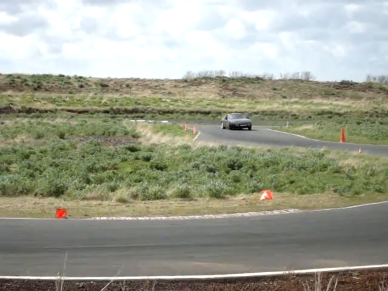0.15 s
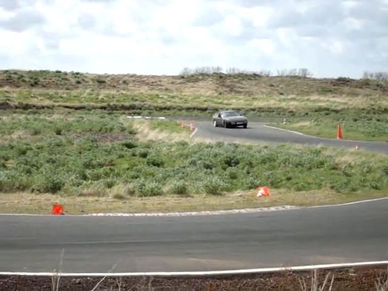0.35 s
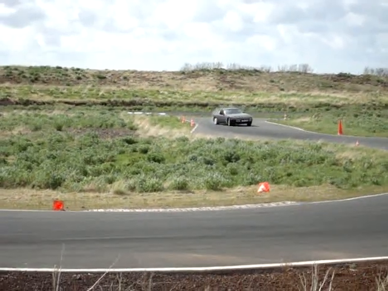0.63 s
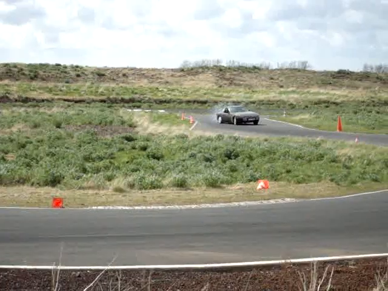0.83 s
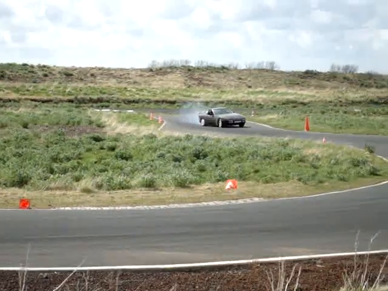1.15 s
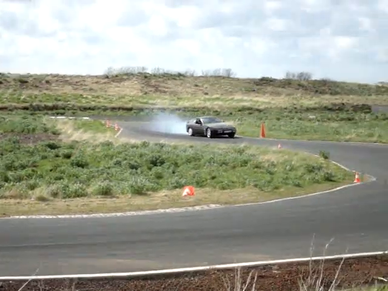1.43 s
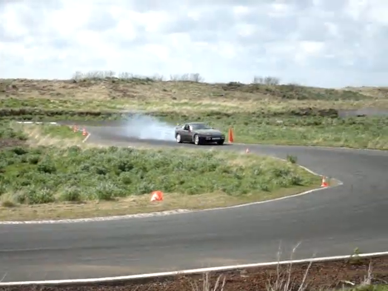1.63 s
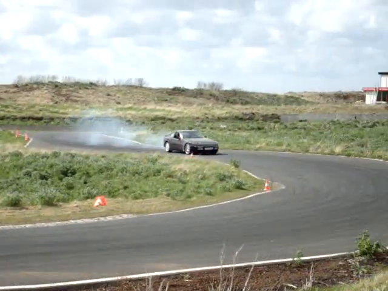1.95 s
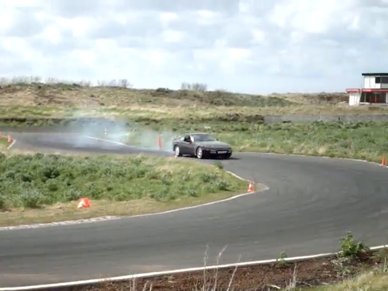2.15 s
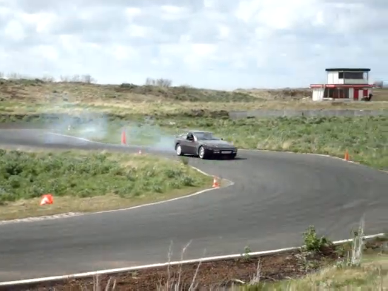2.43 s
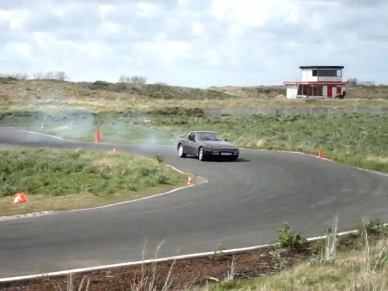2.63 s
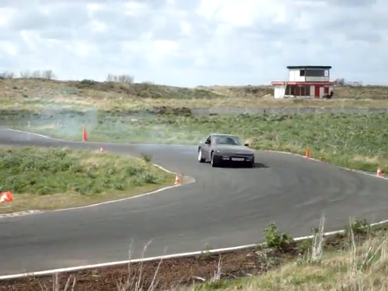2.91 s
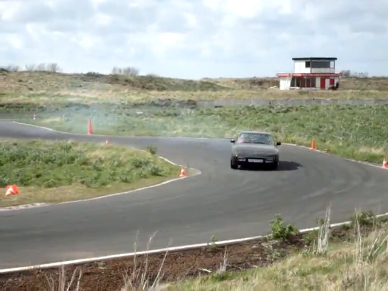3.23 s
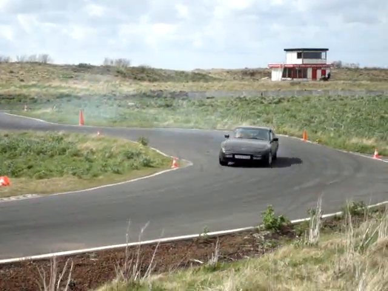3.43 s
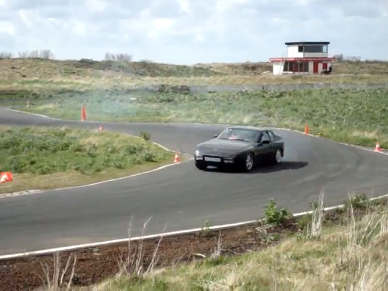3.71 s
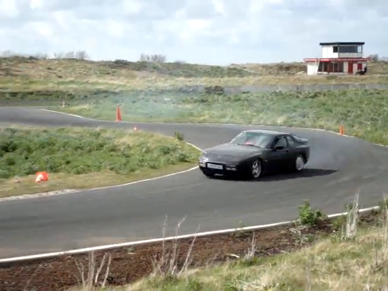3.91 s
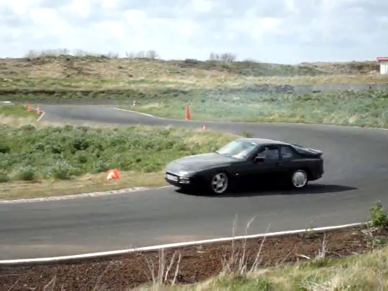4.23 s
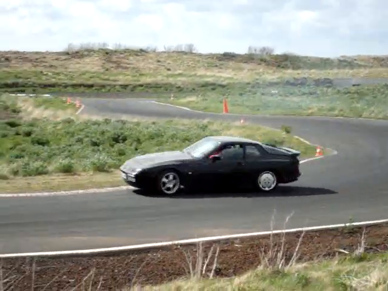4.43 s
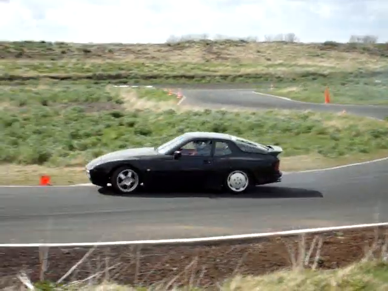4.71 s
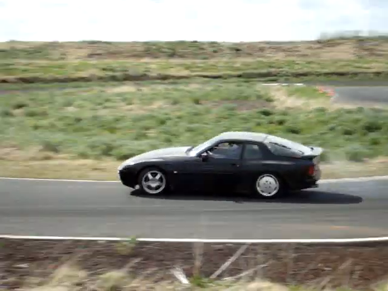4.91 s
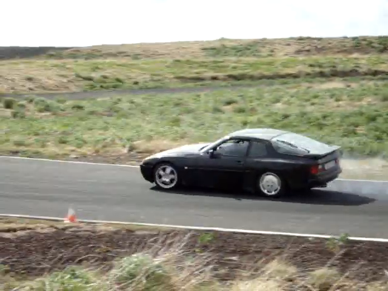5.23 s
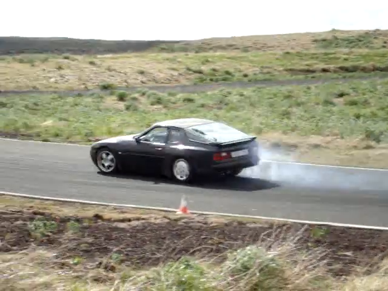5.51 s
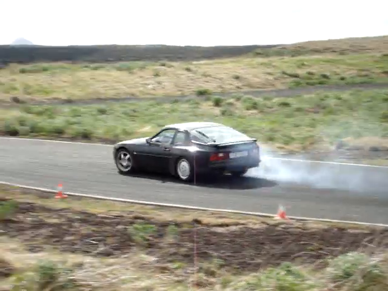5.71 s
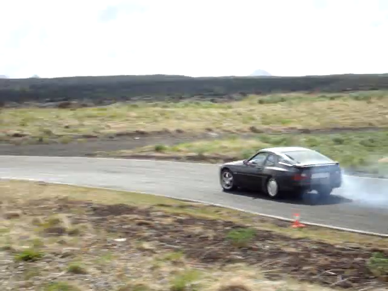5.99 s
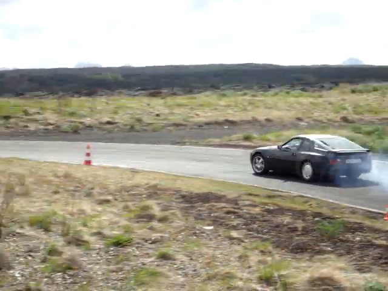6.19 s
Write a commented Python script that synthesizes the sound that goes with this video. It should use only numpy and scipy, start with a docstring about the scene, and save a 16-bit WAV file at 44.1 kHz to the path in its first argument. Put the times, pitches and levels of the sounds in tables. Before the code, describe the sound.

An open-air track heard through one unprotected microphone, with faint steady hiss. From 0 s, wind gusts strike in quick lumpy bursts, with low thuds and sharp cracks, hardest around 2 to 2.7 s. Beneath them a distant car engine rises from 0 to about 1.4 s, with tyre scrub and hiss and a thin, restless high whine from about 0.6 to 1.7 s. The throttle lifts; engine pitch and level sink, leaving mostly wind until about 3 s, when slight scrubbing and a small rev return. Gusts ease after 3.6 s. Around 3.8 s tyres catch with a rough chirp, then a loud mid-pitched squeal holds from 4 to 5.9 s, wavering rapidly about eight times a second, with brief harsher screeches, roaring rubber and gritty hiss. The engine grows lower-toned and stronger near 5.6 s. The squeal climbs slightly, blurs and fades by 6.3 s.

```python
"""A sports car drifts round a kart track. Far off, spinning tyres hiss and whine as the engine rises;
off the throttle comes a lull, then a long squealing slide close by, which fades at the end.
Gusts buffet the microphone throughout, hardest before the slide. Wind and rubber are filtered noise,
the engine a sum of harmonics, the squeal a phase-modulated tone; a fast limiter holds the peaks down."""
import sys
import numpy as np
from scipy import signal
from scipy.fft import rfft, irfft, next_fast_len
from scipy.io import wavfile
from scipy.ndimage import uniform_filter1d, minimum_filter1d

SR = 44100
rng = np.random.default_rng(int(sys.argv[2]) if len(sys.argv) > 2 else 0)


def transcribe(u):
    """Save the signal u as a 16-bit wav file named by the first command-line argument.

    u: samples, shape (n,) or (channels, n), limited to [-1, 1]; the rate is SR.
    q: integer samples, one column per channel.
    """
    v = np.clip(np.atleast_2d(u).T, -1, 1)
    q = np.round(v * 32767).astype(np.int16)
    wavfile.write(sys.argv[1], SR, q)


N = 280476
TIME = np.arange(N) / SR


def amp(db):
    """Level law: decibels to amplitude gain."""
    return 10 ** (np.asarray(db) / 20)


def unit(x):
    """Normalisation to unit rms."""
    return x / np.sqrt(np.mean(x ** 2) + 1e-20)


def curves(rows):
    """Linear interpolation in time of each column of a table."""
    s, *columns = np.transpose(rows)
    return [np.interp(TIME, s, column) for column in columns]


def colour(points, hz):
    """Spectral envelope: gain at the given frequencies, in dB straight against log frequency."""
    f, db = np.transpose(points)
    return amp(np.interp(np.log(hz + 1), np.log(f + 1), db))


def shaped(x, points):
    """Linear filtering: multiplies the spectrum of a sound by an envelope."""
    return irfft(rfft(x) * colour(points, np.fft.rfftfreq(N, 1 / SR)), N)


def wander(hz):
    """Low-passed Gaussian noise of rms 1, with a bandwidth set by the given rate."""
    slow = TIME[::16]
    size = next_fast_len(len(slow))
    f = np.fft.rfftfreq(size, slow[1])
    low_pass = np.exp(-.5 * (f / hz) ** 2)
    drift = irfft(rfft(rng.standard_normal(size)) * low_pass, size)
    return unit(np.interp(TIME, slow, drift[:len(slow)]))


def steadied(x, size):
    """Automatic levelling: division by the running rms, averaged twice over size samples."""
    power = uniform_filter1d(uniform_filter1d(x ** 2, size), size)
    return x / np.sqrt(abs(power) + 1e-12)


def noise_floor(level_db=-53):
    """Stationary noise: the steady hiss of the microphone."""
    # hiss spectrum: (frequency [Hz], relative density [dB per Hz])
    floor_colour = [(200, 2.5), (1500, -3.5), (3000, -5.5), (6000, -7.5), (10000, -12)]
    return amp(level_db) * unit(shaped(rng.standard_normal(N), floor_colour))


def gust_level(rise_s=0.01, fall_s=0.012, breeze_db=-36.5):
    """Exponential envelopes: each gust rises quickly, holds and dies back to the breeze."""
    # gusts on the microphone: (start [s], length [s], strength before the wind's trim [dB])
    gusts = [(0, 0.25, -16.5), (0.274, 0.15, -19), (0.479, 0.1, -15.5), (0.617, 0.098, -17.5),
             (0.726, 0.17, -20), (0.91, 0.12, -19.5), (1.072, .08, -17), (1.192, .36, -18.5),
             (1.6, .12, -16.5), (1.766, 0.033, -23), (1.924, 0.088, -22.5), (2.013, .28, -16),
             (2.332, .14, -18), (2.515, 0.12, -19.5), (2.684, 0.044, -15), (2.8, 0.19, -25),
             (3.056, 0.083, -19), (3.188, .31, -17.5), (3.522, 0.15, -18.5), (3.75, 0.12, -27),
             (3.933, 0.11, -29.5), (4.127, 0.029, -25), (4.344, .08, -28), (4.6, 0.054, -29),
             (4.733, 0.035, -23), (4.802, .13, -27.5), (5.082, .03, -22.5), (5.157, .17, -25.5),
             (5.44, 0.072, -23), (5.8, 0.22, -22.5), (6.081, 0.185, -23.5)]
    level = np.full(N, amp(breeze_db))
    for start, length, db in gusts:
        outside = np.maximum((start - TIME) / rise_s, (TIME - start - length) / fall_s)
        level = np.maximum(level, amp(db) * np.exp(-np.maximum(outside, 0)))
    return level


def wind(lump_db=7.0, lump_hz=70, edge_db=-15, trim_db=1.0, swell_db=1.5, ceiling=0.85):
    """Turbulence: eddies hit the microphone in lumps of milliseconds; the harder ones are brighter."""
    # wind spectrum: (frequency [Hz], relative density [dB per Hz])
    wind_colour = [(18, -50), (35, -43), (60, -34.5), (100, -9.5), (160, -5.5), (280, 1.5), (550, -2.5),
                   (850, -10), (1300, -17), (2000, -27.5), (3000, -46.5), (6000, -72), (10000, -100)]
    lumps = amp(lump_db * np.minimum(wander(lump_hz), 1.6))
    turbulence = steadied(lumps * unit(shaped(rng.standard_normal(N), wind_colour)), size=900)
    flow = turbulence * gust_level() * amp(trim_db + swell_db * wander(21.6))
    # the big swings are rounded off
    flow = ceiling * np.tanh(flow / ceiling)
    # pressure goes with the square of the air speed, which adds a coarse edge
    high_pass = signal.butter(2, 400, "high", fs=SR, output="sos")
    edge = signal.sosfilt(high_pass, flow * abs(flow))
    return flow + amp(edge_db) * edge


def eddies(rate_per_s=30, over_gust_db=10.5, spread_db=3.5, crack_db=-28, crack_spread_db=5):
    """Poisson-like arrivals: lesser buffets at random moments, scaled to the gust carrying them."""
    at = np.flatnonzero(rng.random(N) < rate_per_s / SR)
    size, sharpness = rng.standard_normal((2, N))[:, at]
    db = 20 * np.log10(gust_level()[at]) + over_gust_db + spread_db * size
    return list(zip(TIME[at], db, db + crack_db + crack_spread_db * sharpness))


def buffets(thud_hz=663, octaves_per_db=0.0675, spread_octaves=0.91, cycles=0.63,
            crack_trim_db=1.0, crack_s=0.00029, crack_hz=2400):
    """Impulsive pressure: a strong eddy gives a thud of one or two swings, with a crack at its centre."""
    # hardest single buffets: (time [s], thud level [dB], crack level before crack_trim_db [dB])
    hard_blows = [(.083, -5, -40), (.111, 3.5, -15), (.176, -2.5, -21), (.502, -4, -6), (.757, -4.5, -15),
                  (.867, -7, -30), (.965, 0, -40), (1.116, 1, -40), (1.143, 4.5, -8), (1.428, 0, -30),
                  (1.46, 3, -23), (1.626, 4.5, -9), (1.772, 1.5, -22), (1.888, -9, -40), (1.989, -4.5, -24),
                  (2.025, -4, -33), (2.037, 3.5, -17), (2.16, 5.5, -6.5), (2.207, -3, -33),
                  (2.239, 7.5, -12), (2.264, 1, -35), (2.347, -0.5, -23), (2.382, -6, -21),
                  (2.438, -2, -32), (2.524, -4, -34), (2.699, 6, -13), (2.757, -6, -40), (2.915, -1.5, -19),
                  (3.012, -6.5, -40), (3.087, -10, -13), (3.327, -1.5, -19), (3.398, -8, -10.5),
                  (3.432, -4, -17), (3.463, -1.5, -34), (3.526, -0.5, -18), (3.826, 1.5, -40),
                  (4.344, -3, -37)]
    out = np.zeros(N)
    blows = list(hard_blows) + eddies()
    for (s, db, sharp_db), (turn, crack_turn, size) in zip(blows, rng.random((len(blows), 3))):
        near = slice(*np.searchsorted(TIME, [s - .02, s + .02]))
        t = TIME[near] - s
        # thuds of 0 dB centre on thud_hz; harder ones are quicker
        hz = thud_hz * 2 ** (octaves_per_db * db + spread_octaves * (size - .5))
        thud = np.exp(-(t * hz / cycles) ** 2) * np.cos(2 * np.pi * (hz * t + turn))
        crack = np.cos(2 * np.pi * (crack_hz * t + crack_turn)) / (1 + (t / crack_s) ** 2) ** 2
        out[near] += amp(db) * thud + amp(sharp_db + crack_trim_db) * crack
    return out


def engine(uneven_db=-6, pipe_uneven_db=-12, waver=0.00064, rasp_db=3.5):
    """Harmonic series of the four-firing cycle; unequal cylinders fill in between the firing lines."""
    # engine run: (time [s], firing rate [Hz], level [dB])
    engine_run = [(0, 165, -37), (.5, 186, -32), (.85, 202, -28), (.98, 206.6, -25), (1.08, 209, -25),
                  (1.2, 217.5, -24), (1.4, 222.5, -24), (1.6, 221, -28), (1.85, 200, -38), (2.3, 165, -43),
                  (2.8, 140, -43), (3.1, 158, -36), (3.5, 140, -39), (4.2, 152, -33), (5.0, 162, -32),
                  (5.55, 170.3, -27), (5.75, 173, -27), (6.36, 182, -33)]
    # engine colour seen from the nose: (frequency [Hz], relative level [dB])
    nose = [(60, -11), (200, 8), (700, -16.5), (1100, 6), (1480, -3.5), (1620, -0.5), (1780, 3), (2000, -7),
            (2500, -3.5), (4000, -15.5), (6000, -31)]
    # engine colour seen from the tailpipe: (frequency [Hz], relative level [dB])
    tailpipe = [(60, -28), (170, -13.5), (340, -6), (510, -7), (690, 0), (1000, 0.5), (2000, -40.5),
                (4000, -27), (6000, -38)]
    firing_hz, level_db = curves(engine_run)
    cycle_hz = firing_hz * (1 + waver * wander(15)) / 4
    cycles = np.cumsum(cycle_hz) / SR
    # the car swings past, from nose on to tail on
    rear = np.clip((TIME - 3.8) / 0.61, 0, 1)
    slow = slice(None, None, 64)
    out = np.zeros(N)
    for k, start in enumerate(rng.random(size=80), 2):
        between = k % 4 > 0
        hz = k * cycle_hz[slow]
        nose_gain = colour(nose, hz) * amp(uneven_db * between)
        pipe_gain = colour(tailpipe, hz) * amp(pipe_uneven_db * between)
        gain = (1 - rear[slow]) * nose_gain + rear[slow] * pipe_gain
        out += np.interp(TIME, TIME[slow], gain) * np.sin(2 * np.pi * (k * cycles + start))
    return steadied(out * amp(rasp_db * wander(36)), size=4000) * amp(level_db)


def whine(width_hz=22):
    """Narrow-band noise: a thin, restless tone of the tyres spinning far off."""
    # whine of the first wheelspin: (time [s], pitch [Hz], level [dB])
    whine_path = [(.45, 1700, -70), (.65, 1713, -35), (1.0, 1690, -37), (1.22, 1763, -36),
                  (1.45, 1780, -30.5), (1.62, 1780, -35), (1.75, 1760, -80)]
    hz, level_db = curves(whine_path)
    phase = 2 * np.pi * np.cumsum(hz) / SR
    tone = wander(width_hz) * np.sin(phase) + wander(width_hz) * np.cos(phase)
    return amp(level_db) * unit(tone)


def scrub(hiss_trim_db=9, chatter_db=1.13, chatter_hz=70):
    """Friction noise: rubber tears over grit in a roar round the tread resonance and a hiss, chattering."""
    # rubber scrubbing on asphalt: (time [s], roar level [dB])
    roar_run = [(0, -32), (.2, -35.5), (.66, -26), (.89, -40), (1.0, -28.5), (1.55, -29), (1.85, -67),
                (2.79, -50), (3.07, -27.5), (3.33, -39), (3.67, -27.5), (3.88, -18.5), (4.15, -23.5),
                (4.7, -19), (5.1, -22.5), (5.59, -18), (6.21, -21), (6.36, -26.5)]
    # tyres grinding on the grit: (time [s], hiss level before hiss_trim_db [dB])
    hiss_run = [(0.0, -44), (0.21, -53), (0.46, -37), (0.92, -41), (1.1, -35.5), (1.47, -36.5), (1.82, -50),
                (2.27, -57), (2.91, -52.5), (3.01, -42.5), (3.13, -53.5), (3.59, -50.5), (3.9, -37.5),
                (4.9, -31), (5.07, -35.5), (5.49, -29), (6.29, -34.5), (6.36, -40)]
    # roar spectrum: (frequency [Hz], relative density [dB per Hz])
    roar_colour = [(100, -35.5), (400, -40.5), (700, -6), (900, -9), (1120, 2.5), (1300, -3), (1550, -12.5),
                   (1800, -8), (1980, -9), (2400, -12.5), (3500, -29), (9000, -57)]
    # hiss spectrum: (frequency [Hz], relative density [dB per Hz])
    hiss_colour = [(500, -35), (1500, -12), (1850, -1.5), (2400, 3.5), (3000, 2.5), (3700, 0), (4250, -7),
                   (5700, -8), (7000, -20), (8800, -22.5), (10000, -27.5)]
    (roar_db,), (hiss_db,) = curves(roar_run), curves(hiss_run)
    chatter = amp(chatter_db * wander(chatter_hz))
    roar = unit(chatter * shaped(rng.standard_normal(N), roar_colour)) * amp(roar_db)
    hiss = unit(chatter * shaped(rng.standard_normal(N), hiss_colour)) * amp(hiss_db + hiss_trim_db)
    return roar + hiss


def tightness(wheel_hz=7.97, bite_s=4.14, rise_share=0.602):
    """Periodic loading: tread tension in each wheel turn, lowest at the bite, highest before letting go."""
    ramp = signal.sawtooth(2 * np.pi * wheel_hz * (TIME - bite_s), rise_share)
    # rounding the corners keeps it a little inside -1 to 1
    return uniform_filter1d(ramp, size=800)


def flare():
    """Transient excitation: decibels added to the overtones where the rubber grabs hard."""
    # screeches: (centre [s], half length [s], flare [dB])
    screeches = [(3.895, .03, 13.5), (4.02, 0.012, 17.5), (4.164, 0.018, 11.5), (4.932, 0.017, 9.5),
                 (4.986, 0.016, 8.5), (5.128, .025, 5.5), (5.415, 0.04, 10), (5.558, 0.026, 7)]
    return sum(db * np.exp(-((TIME - s) / half) ** 4) for s, half, db in screeches)


def squeal(jitter=0.02006, jitter_hz=140, flutter_db=2.0, tone_trim_db=-1.5, smear_hz=75, smear_trim_db=-2,
           overtone_trims_db=(-2.0, -6.0, -21), shading_db=-3,
           tight_tone_db=-1.5, tight_overtone_db=-1.4, flare_share=0.16):
    """Stick-slip oscillation of the tread blocks; as grip fails they fall out of step and the tone smears."""
    # singing tread: (time [s], mean pitch [Hz], swing with tightness [share of pitch])
    pitch_path = [(3.75, 1050, 0.011), (3.88, 933.6, 0.011), (4.04, 925, .015), (4.25, 853.6, 0.067),
                  (4.382, 890.4, 0.015), (4.55, 889, 0.042), (4.781, 935, 0.041), (4.95, 992.8, .025),
                  (5.12, 869, 0.044), (5.22, 931, 0.057), (5.421, 916.5, 0.043), (5.581, 929, .05),
                  (5.68, 942.5, 0.067), (5.82, 1040, 0.034), (5.951, 1077, 0.02), (6.3, 1108, 0.018)]
    # steadiness of stick and slip: (time [s], power share of clear tone [0-1])
    grip = [(3.75, 0.01), (3.86, 0.04), (3.9, 0.99), (3.97, 0), (4.03, 0.75), (4.4, 0.91), (5.15, 1),
            (5.33, 0.9), (5.55, 0.88), (5.85, 0.91), (6.0, .45), (6.3, 0.3)]
    # loudness before trims, tightness and flares: (time [s], tone level [dB], overtone level [dB])
    loudness = [(3.75, -22.5, -35), (3.87, -19.5, -31.5), (3.96, -17, -29.5), (4.04, -12.5, -30),
                (4.26, -11.5, -22.5), (4.48, -10.5, -17.5), (4.7, -10, -23), (5.15, -11, -25.5),
                (5.32, -14.5, -32), (5.42, -13, -28.5), (5.49, -16, -27.5), (5.57, -13, -20),
                (5.68, -11.5, -20), (5.74, -15.5, -23), (5.82, -11, -28), (6.0, -16, -37),
                (6.27, -20.5, -38.5), (6.32, -43, -37)]
    mean_hz, swing = curves(pitch_path)
    level_db, overtone_db = curves(loudness)
    tight, screech_db = tightness(), flare()
    hz = mean_hz * (1 + swing * tight)
    # a tight tread sings more weakly; a screech lifts the tone by only a share of its flare
    level_db = level_db + tight_tone_db * tight + flare_share * screech_db
    overtone_db = overtone_db + tight_overtone_db * tight + screech_db
    clear = curves(grip)[0]
    # a tread that barely grips catches and lets go, so its pitch strays further
    catches = wander(30) * (.008 + .04 * (1 - clear))
    phase = 2 * np.pi * np.cumsum(hz * (1 + catches + jitter * wander(jitter_hz))) / SR
    flutter = steadied(amp(flutter_db * wander(100)), size=2000)
    tone = np.sqrt(2 * clear) * flutter * np.sin(phase) * amp(tone_trim_db)
    narrow_noise = wander(smear_hz) * np.sin(phase) + wander(smear_hz) * np.cos(phase)
    smear = np.sqrt(1 - clear) * narrow_noise * amp(smear_trim_db)
    # the top overtones weaken as the tyre turns away
    turned = np.clip((TIME - 4.5) / 0.35, 0, 1)
    overtones = np.zeros(N)
    for k, db in enumerate(overtone_trims_db, 2):
        # the higher the overtone, the less the blocks agree on its timing
        partial = amp(3.0 * wander(60)) * np.sin(k * phase + 0.25 * k * wander(110))
        overtones += amp(db + shading_db * turned * (k > 2)) * unit(partial)
    # linear fades of 52 ms outside the table's first and last moments
    inside = np.minimum(TIME - pitch_path[0][0], pitch_path[-1][0] - TIME)
    sliding = np.clip(inside / 0.052 + 1, 0, 1)
    singing = amp(level_db) * (tone + smear)
    return sliding * (singing + amp(overtone_db) * np.sqrt(clear) * flutter * overtones)


def scene():
    """Superposition: the car heard across the track, plus wind and hiss at one microphone."""
    # path from car to microphone, with its ground-echo notch: (frequency [Hz], gain [dB])
    path = [(1900, 0), (2020, -3.5), (2140, -14.5), (2260, -4), (2380, -2)]
    car = shaped(engine() + whine() + scrub() + squeal(), path)
    fade_in = np.minimum(TIME / .008, 1)
    return (fade_in * (noise_floor() + wind() + buffets() + car))[None]


def record(dry, limit=0.96, recovery_db_per_s=200, low_cut_hz=55, edge_hz=10080):
    """Peak limiting: after a low cut, each peak ducks what follows it; a low-pass then limits the band."""
    low_cut = signal.butter(2, low_cut_hz, "high", fs=SR, output="sos")
    sound = signal.sosfilt(low_cut, dry)
    over_db = 20 * np.log10(np.maximum(abs(sound[0]) / limit, 1))
    # the deepest duck so far, recovering along a straight line in dB
    fall = TIME * recovery_db_per_s
    duck_db = np.maximum.accumulate(over_db + fall) - fall
    gain_db = uniform_filter1d(minimum_filter1d(-duck_db, size=31), size=31)
    band_limit = signal.firwin(1023, edge_hz, window=("kaiser", 9), fs=SR)[None]
    return signal.oaconvolve(sound * amp(gain_db), band_limit, "same")


dry = scene()
out = record(dry)
transcribe(out)
```